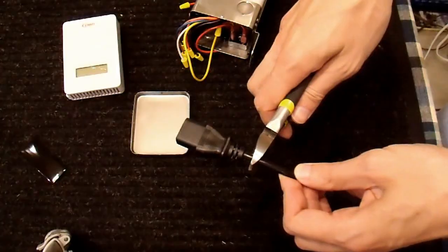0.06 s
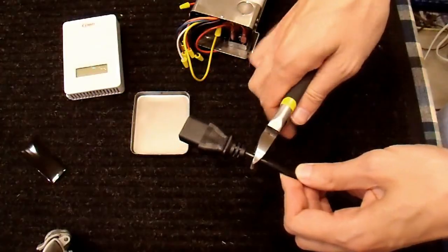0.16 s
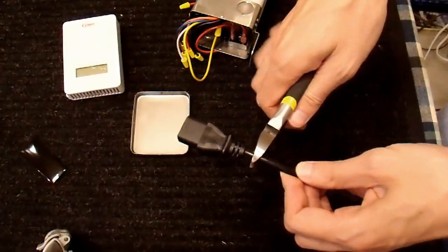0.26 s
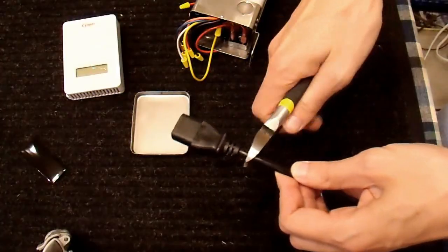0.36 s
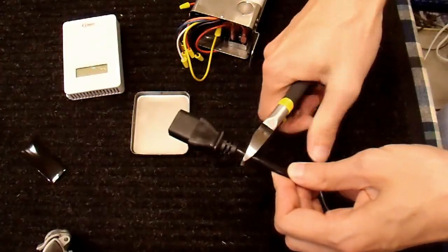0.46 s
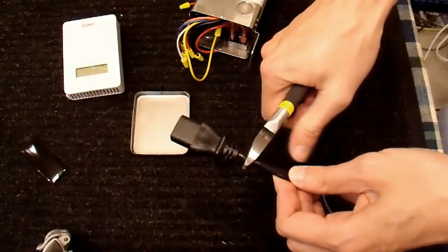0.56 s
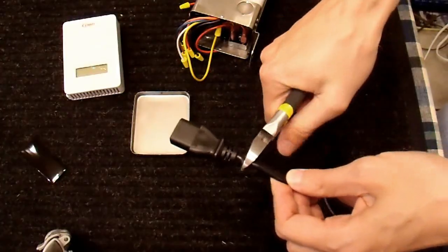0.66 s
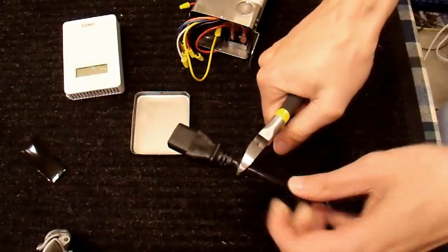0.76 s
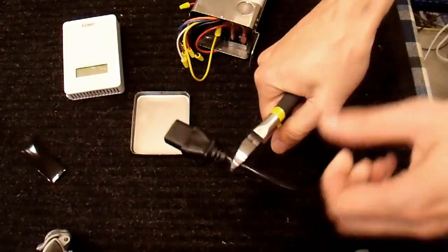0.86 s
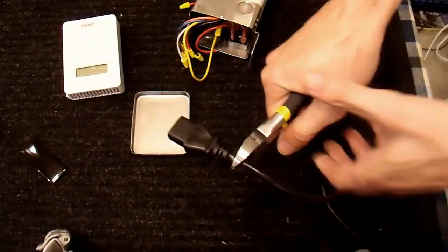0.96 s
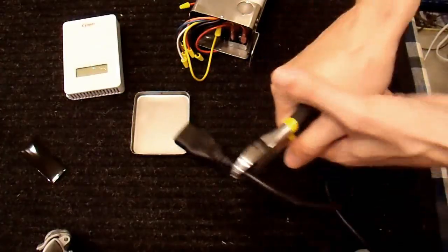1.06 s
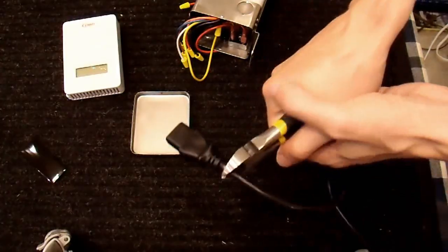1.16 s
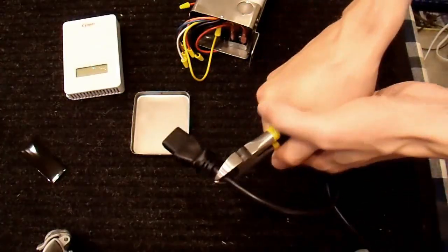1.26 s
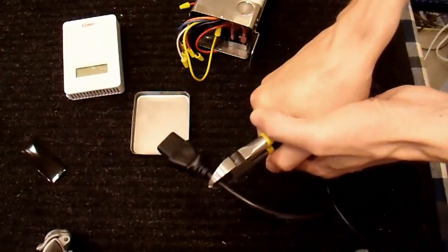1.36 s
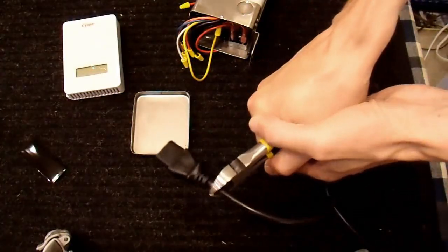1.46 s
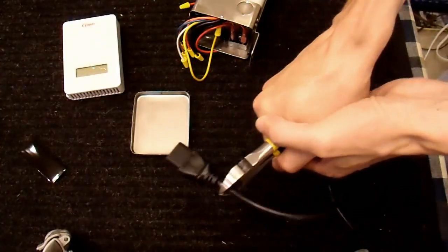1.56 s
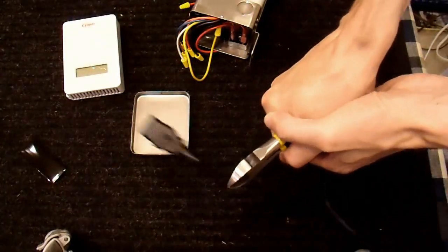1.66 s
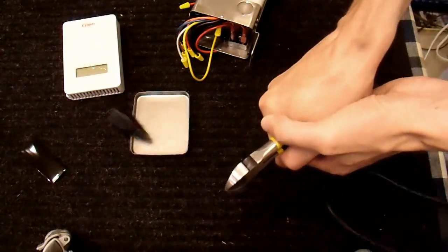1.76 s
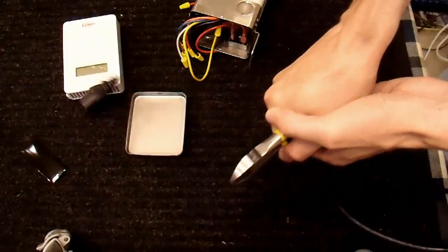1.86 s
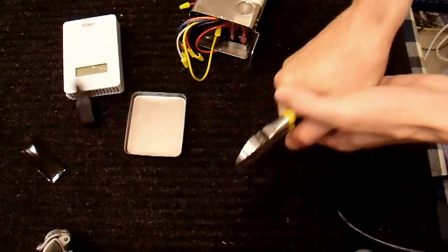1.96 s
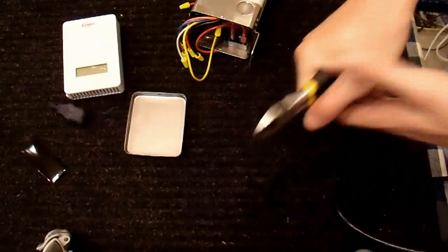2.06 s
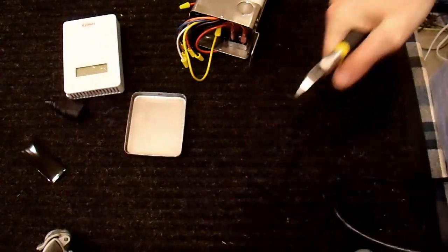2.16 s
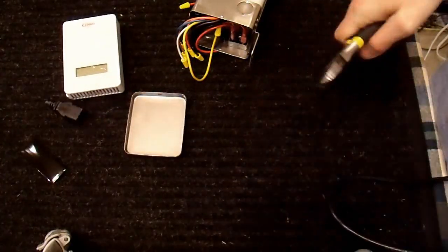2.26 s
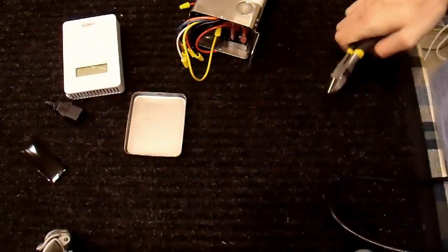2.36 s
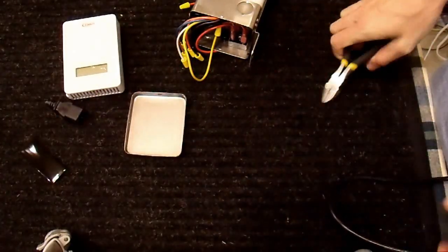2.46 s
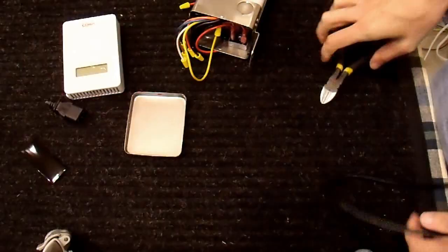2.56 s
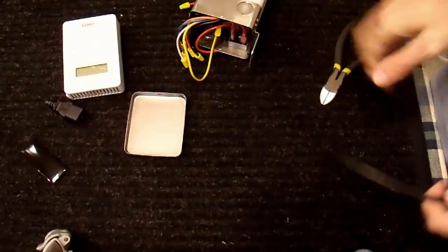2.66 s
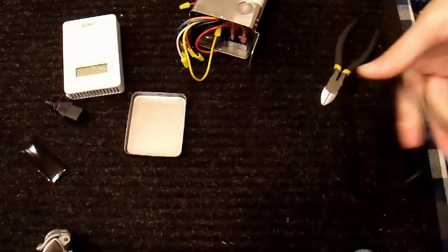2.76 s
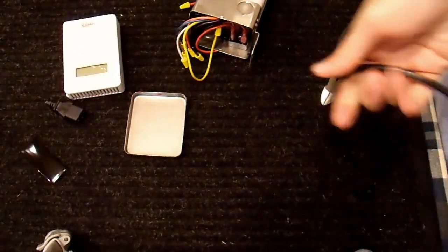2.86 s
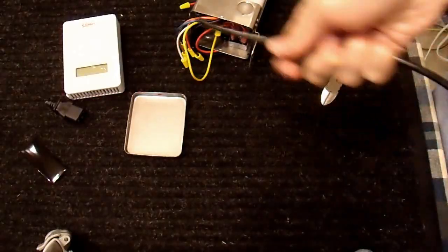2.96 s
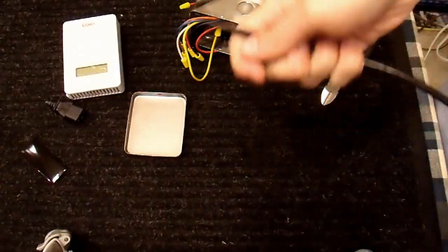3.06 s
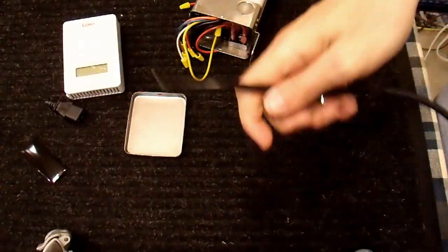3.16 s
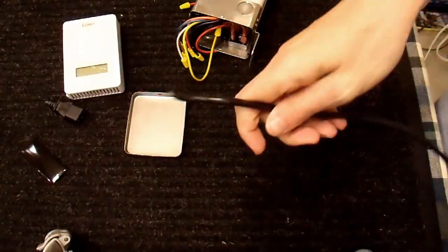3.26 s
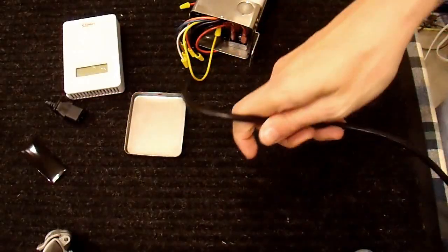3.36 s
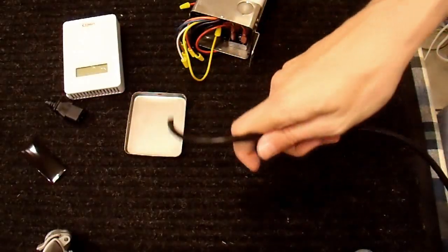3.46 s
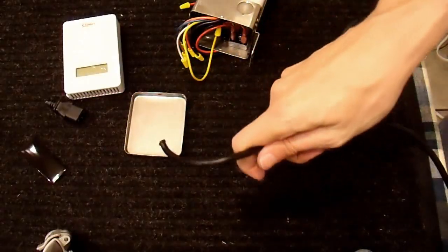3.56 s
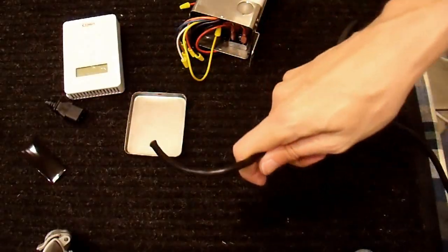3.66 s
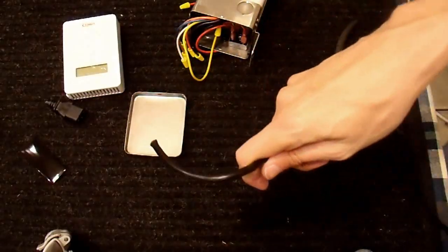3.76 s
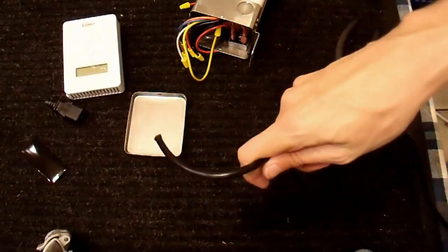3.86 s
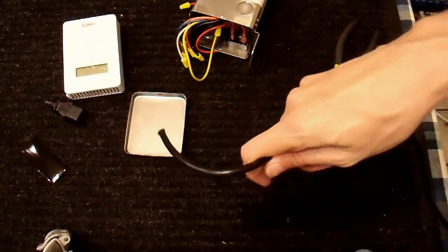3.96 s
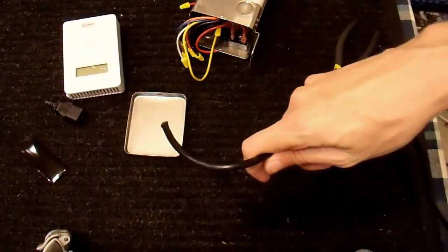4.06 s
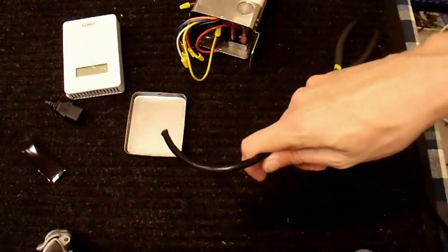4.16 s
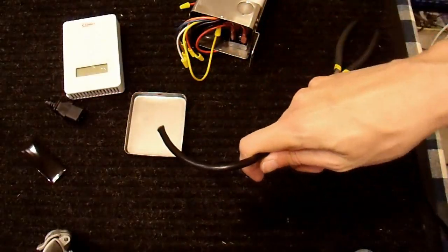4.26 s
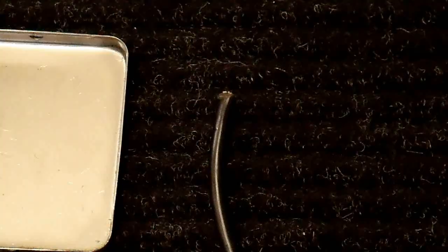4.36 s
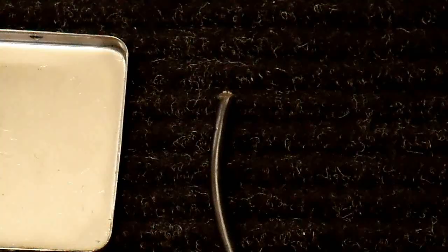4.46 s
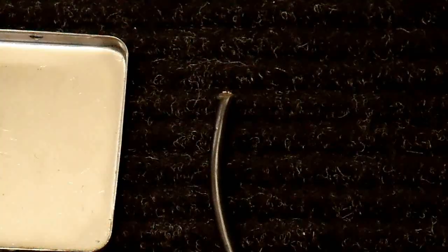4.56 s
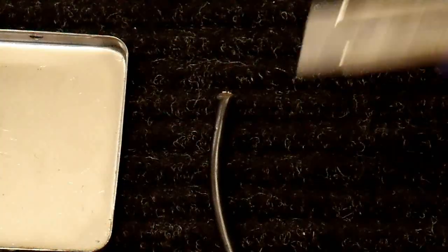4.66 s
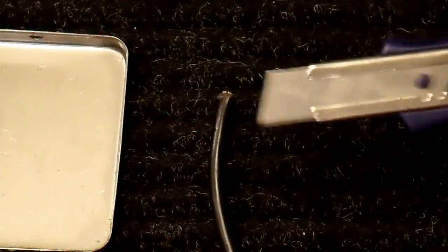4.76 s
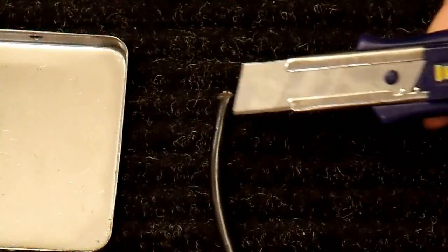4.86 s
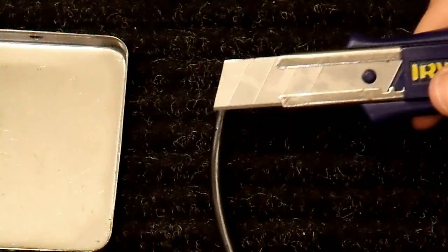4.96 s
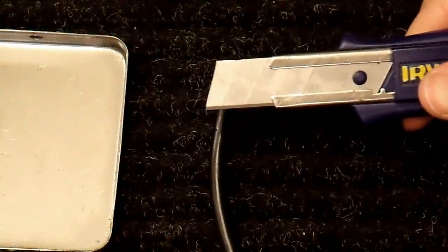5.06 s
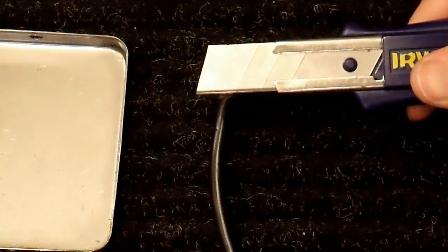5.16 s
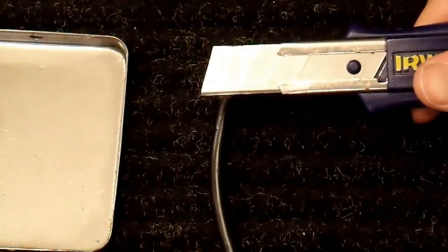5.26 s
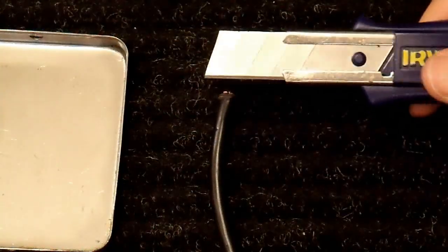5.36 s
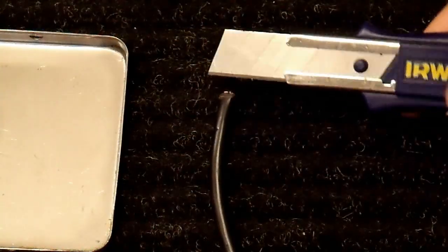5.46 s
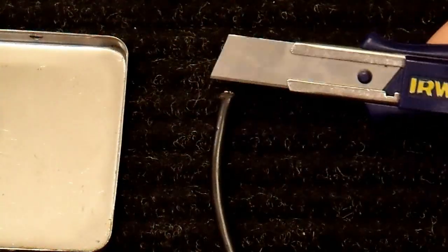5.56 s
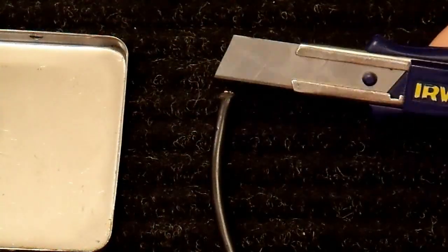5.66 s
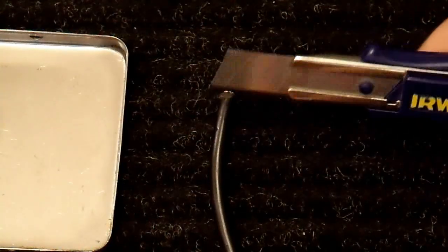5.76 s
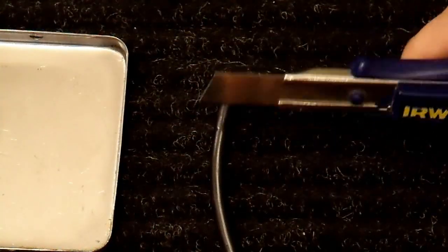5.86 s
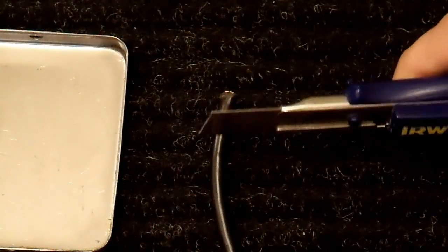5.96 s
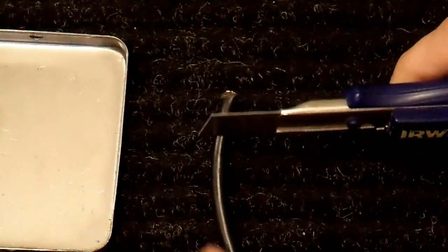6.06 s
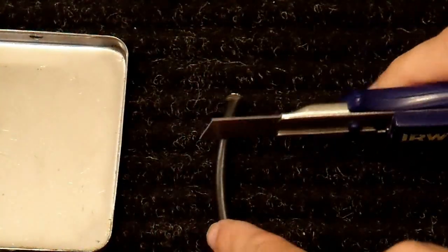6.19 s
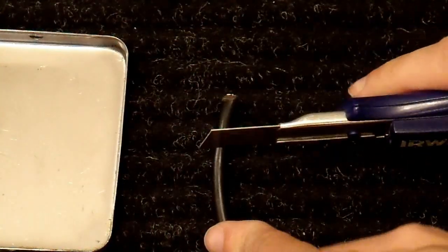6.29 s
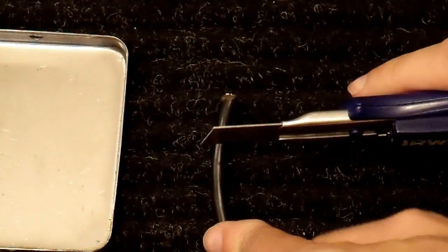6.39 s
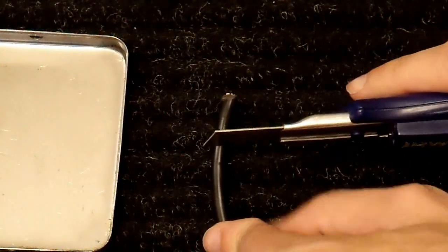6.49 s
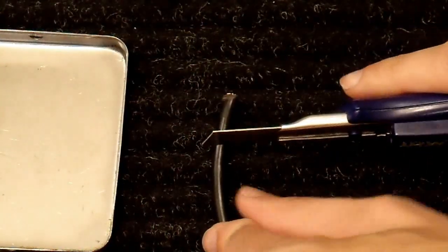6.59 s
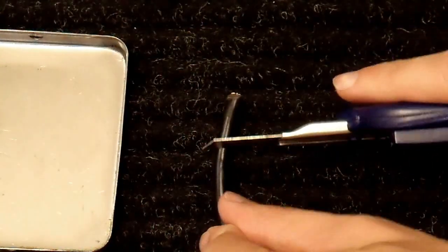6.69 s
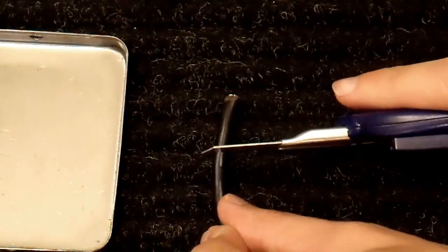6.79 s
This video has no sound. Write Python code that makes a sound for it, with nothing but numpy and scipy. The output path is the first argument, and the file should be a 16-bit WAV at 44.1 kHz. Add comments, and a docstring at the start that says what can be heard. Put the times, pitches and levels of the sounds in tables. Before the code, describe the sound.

Over a faint steady fan, hands rub lightly on a cord, then side cutters crack through it and their handles clack shut. The plug flies off, clangs on a tin lid and tumbles away in weakening knocks. The cutters thump and clatter onto a padded bench, the cord slaps down softly, then a knife slider snaps out in sharp metallic clicks. Close microphone, small room, loud peaks overloaded.

```python
"""Cutting a cord, then clicking out a blade

Side cutters snap through a power cord on a carpeted bench; the plug flies off, rings a tin lid and tumbles
away. The cutters are put down and the cord is laid out; after a hard cut a snap-off knife is pushed out by
notches. Hits are dying noise bursts in each body's colour, with sine modes where metal or bench top rings; rubs
are swelling noise. Near echoes and a small room follow each hit, a fan of filtered noise and tones runs quietly
underneath, and the microphone's amplifier overloads on loud clicks; the knife's handle knocks dully under two
of them."""
import sys
import numpy as np
from scipy import signal
from scipy.fft import rfft, irfft
from scipy.io import wavfile

SR = 44100
rng = np.random.default_rng(int(sys.argv[2]) if len(sys.argv) > 2 else 0)


def unload_wav(signal):
    """Save mono or channel-first audio to the path in sys.argv[1] as 16-bit WAV at rate SR, clipped to [-1, 1]."""
    wavfile.write(
        sys.argv[1],
        SR,
        np.round(np.clip(np.atleast_2d(signal).T, -1, 1) * 32767).astype(np.int16),
    )


N = 301026
TIME = np.arange(N) / SR   # s
CUT_S, CUTOFF_HZ = 4.2928, 15900   # hard cut between the shots; top of the microphone's range

# fan and microphone hiss, colour before and after the cut: (f/Hz, level/dB)
FAN_WIDE = [(15, -45), (25, -4.5), (84, -26), (123, -4), (149, -17.5), (263, -9), (363, -12.5), (503, -10),
            (911, -6), (1230, -11.5), (2480, -4), (3080, -9.5), (10400, -19.5), (12200, -17.5),
            (16000, -25)]
FAN_CLOSE = [(15, -36), (25, 1), (92, -25), (114, -13.5), (242, -8.5), (263, -15.5), (354, -8), (677, -8.5),
             (911, -5), (1130, -11.5), (2160, -4.5), (2480, -6), (9320, -18.5), (10700, -20), (16000, -22)]
FAN_WIDE_DB, FAN_CLOSE_DB = -53.5, -53.5
# resonances in the rush of air before and after the cut: (f/Hz, width/Hz, level/dB)
DUCTS_WIDE = [(892, 81, -64), (2346, 190, -58), (7000, 410, -66)]
DUCTS_CLOSE = [(898, 68, -66), (2180, 120, -59.5), (6730, 990, -64), (10900, 314, -69.5)]
# steady tones of the fan and electronics before and after the cut: (f/Hz, level/dB)
HUM_WIDE = [(118.4, -75), (360.7, -73), (11741, -72)]
HUM_CLOSE = [(360.7, -73), (726.7, -74), (10783, -82), (11741, -79)]

# decay of the small room, band by band: (f/Hz, t60/s)
ROOM_T60 = [(200, 0.43), (1500, .4), (4500, 0.46), (9000, 0.35), (16000, 0.2)]
# nearby surfaces, before each source's own echo trim: (delay/s, level/dB)
ECHOES = [(0.0087, -19), (0.011, -17), (.027, -23)]

# hands and cord rubbing: (t/s, level/dB, length/s)
RUBS = [(0.305, -53, 0.037), (0.365, -53, .1), (0.90, -54, 0.026), (0.985, -50, 0.021),
        (1.585, -47.5, 0.03), (3.51, -52, 0.1)]
# colour of the rubbing: (f/Hz, level/dB)
RUB_COLOUR = [(200, -20), (900, -11), (1800, 2), (2800, -3.5), (4500, -11.5), (12000, -26), (16000, -29.5)]
# the cord dragged over the carpet: (t/s, level/dB, length/s)
DRAGS = [(2.935, -46, .11), (3.07, -56, 0.035)]
# colour of the dragging: (f/Hz, level/dB)
DRAG_COLOUR = [(500, -19), (3000, -7), (4700, 2.5), (7500, -5.5), (11000, -1), (16000, -12)]

# hand and cutters bumping the padded bench top, reference level: (t/s, level/dB)
BUMPS = [(0.889, -57), (2.4510, -36.5), (2.5470, -28), (2.5614, -29.5), (6.60, -55)]
# colour of the bench top: (f/Hz, level/dB)
BENCH_COLOUR = [(25, -22), (85, -1.5), (140, -2.5), (200, -0.5), (290, -2.5), (380, -5.5), (550, -9.5),
                (900, -19), (3000, -43)]
# clearest modes of the bench top, relative to the bump: (f/Hz, level/dB, t60/s)
BENCH_MODES = [(81.4, -21, 0.7), (283, -13, 0.51), (365, -15, 0.38), (373, -17, .36)]
BOOM_DB, BOOM_T60 = -11.5, 0.48   # dB relative to the bump, s
PUSH_S, PUSH_DB = 0.00334, 0   # length of the soft contact, its height relative to the bump

# small steel ticks of the cutters' joint: (t/s, level/dB)
TICKS = [(2.5495, -24), (2.5625, -16.5), (2.618, -27), (2.660, -39), (2.7475, -41), (3.2655, -40.5)]
# colour of the ticks: (f/Hz, level/dB)
TICK_COLOUR = [(500, -25), (2500, -20), (4000, -5), (5300, -5), (6400, 3), (7600, -12.5), (12000, -15),
               (16000, -32)]
TICK_T60 = 0.011   # s
# rubber grips and cord slapping down; the limp cord takes longer to settle: (t/s, level/dB, t60/s)
SLAPS = [(2.7735, -19.5, 0.034), (2.784, -22, 0.031), (3.266, -48, 0.1), (3.732, -33.5, .032),
         (3.741, -42.5, .23)]
# colour of the slaps: (f/Hz, level/dB)
SLAP_COLOUR = [(60, -21), (300, 0.5), (570, 5), (900, -3), (2200, -5.5), (3500, -13.5), (10000, -42),
               (16000, -34)]

# knife slider dropping into its notches, with the blade's ring: (t/s, f/Hz, level/dB)
NOTCHES = [(4.263, 4400, -10), (4.344, 5730, -7), (4.5397, 4318, 6.5), (4.7232, 4190, -8.5),
           (4.86, 4324, 6.5), (5.0993, 4503, 8.5)]
# colour of the notch clicks: (f/Hz, level/dB)
KNIFE_COLOUR = [(100, -37.5), (1500, -21), (2400, -3.5), (3400, -3.5), (4400, 2.5), (5400, -1),
                (6200, -2.5), (7200, 0), (8600, -6.5), (10200, -1), (11200, -3), (12200, 2), (14000, -5.5),
                (16000, -10)]
NOTCH_DB, NOTCH_T60 = 5, 0.014   # dB, s: the same spring drives every click
BLADE_T60 = 0.016   # s
# the slider's spring scraping over the ridge before a notch: (t/s, level/dB)
RATTLES = [(4.522, -35), (4.707, -31.5), (4.854, -35), (5.094, -34)]
# colour of the scraping spring: (f/Hz, level/dB)
RATTLE_COLOUR = [(500, -31.5), (2200, -13), (3300, -1), (4400, 1.5), (5800, -4), (7500, -21), (12000, -24),
                 (16000, -35)]
RATTLE_T60 = 0.05   # s
# the slider settling back as the thumb lets go: (t/s, level/dB, t60/s)
SETTLE = [(5.3433, -24.5, 0.014)]
# dull low knock of the knife's handle under two of the clicks: (t/s, level/dB)
HANDLE_KNOCKS = [(4.3445, -23.5), (5.1005, -25.5)]
# colour of the handle's knock: (f/Hz, level/dB)
HANDLE_COLOUR = [(60, -16.5), (200, -11), (380, -4.5), (650, -14), (1500, -25), (5000, -30)]
HANDLE_T60 = 0.015   # s

# the plug's corner striking the tin lid: (t/s, level/dB, t60/s)
TIN_HITS = [(1.7368, -4, 0.029), (1.7515, -29, 0.024)]
# colour of the crash: (f/Hz, level/dB)
TIN_COLOUR = [(100, -26), (900, -2), (2200, -20), (4000, -13), (5800, 10.5), (7200, -6), (8500, -12),
              (13000, -17.5), (16000, -7)]
# tin lid modes; the close pair near 2760 Hz beats: (f/Hz, level/dB, t60/s)
TIN_MODES = [(883.6, -22, .42), (2385, -26, .38), (2759, -19.5, .63), (2768.6, -21, .6), (3366, -25, .54),
             (3478, -20, .4), (3698, -28, .45), (3812, -26, .52), (4290, -18, .42), (4389, -21, .42),
             (4525, -17, .52), (4892, -18, .43), (5318, -20, .3), (5418, -26, .55), (5689, -16, .27),
             (5793, -10, .3), (6190, -16, .32), (7038, -14, .22), (7456, -27, .28), (7800, -21, .27),
             (8382, -26, .26), (9790, -32, .2), (13000, -29, .2), (15200, -33, .18)]
# the tumbling plug hitting a plastic case: (t/s)
BOUNCES = [1.7947, 1.8530, 1.9430, 2.0920]
# the plug landing on the carpet in between: (t/s)
LANDINGS = [1.7555, 1.954]
# colour of the plug's contacts: (f/Hz, level/dB)
PLUG_COLOUR = [(100, -19.5), (500, -22.5), (820, -2), (1050, -8.5), (1550, 5.5), (2100, -5), (3000, -7.5),
               (4800, -6), (7500, -15.5), (11500, -17.5), (16000, -31)]
# levels in dB as if at the moment the lid is struck, decays in s
TUMBLE_LOSS_DB_PER_S = 56.5
BOUNCE_DB, BOUNCE_T60 = -7.5, 0.026   # hard contact with the case
CHATTER_DB, CHATTER_T60 = -19, 0.12   # the plug shudders after each bounce
LANDING_DB, LANDING_T60 = -18, 0.073   # softer contact with the carpet
LANDING_THUD_DB, LANDING_THUD_T60 = -29.5, 0.22   # the bench top under it

# jaws breaking through sheath and wires: (t/s, level/dB)
SNAPS = [(1.5922, 6), (1.6015, -2.5), (1.6105, -12.5), (1.6185, -6)]
# colour of the snap: (f/Hz, level/dB)
SNAP_COLOUR = [(100, -35), (1100, -21), (1500, -11.5), (2300, -8.5), (3100, -9.5), (4100, 2), (5000, 0.5),
               (6500, -9.5), (10000, -11.5), (16000, -25.5)]
SNAP_T60 = 0.022   # s
# the steel jaws ringing on after the cord gives way: (f/Hz, level/dB, t60/s)
JAW_MODES = [(4690, -20, .3), (5006, -21, .27)]
# handles slamming shut, then cutters dropped on the bench: (t/s, level/dB)
CLACKS = [(1.6413, 3.5), (2.7685, -13.5)]
# colour of the clacks: (f/Hz, level/dB)
CLACK_COLOUR = [(100, -18), (600, -19.5), (1000, -9), (1450, -15.5), (1850, -3), (2300, -6), (3000, 2.5),
                (3600, -18.5), (5800, -2.5), (7500, -13.5), (11000, -11.5), (16000, -29)]
CLACK_T60, JOLT_DB = 0.017, -16.5   # s; dull jolt relative to its clack


def amp(db):
    """Decibels to gain."""
    return 10 ** (np.asarray(db) / 20)


def at_hz(points, hz):
    """Read a table on a log-frequency axis."""
    f, value = np.transpose(points)
    return np.interp(np.log(np.maximum(hz, 1)), np.log(f), value)


def dying(t, t60):
    """Exponential decay that starts at t = 0 and falls 60 dB in t60."""
    return (t >= 0) * np.exp(-np.log(1000) * np.maximum(t, 0) / t60)


def coloured(x, spectrum, size=8192):
    """Causal (minimum-phase) body filter that keeps the power of white noise."""
    gain = amp(at_hz(spectrum, np.arange(size // 2 + 1) * SR / size))
    cepstrum = irfft(np.log(gain / np.sqrt(np.mean(gain ** 2))))
    # folding the cepstrum forward makes the filter minimum-phase
    cepstrum[1:size // 2] *= 2
    cepstrum[size // 2 + 1:] = 0
    response = irfft(np.exp(rfft(cepstrum)))
    return signal.oaconvolve(x, response)[:N]


def resonate(x, hz, width_hz):
    """One resonance that keeps the power of white noise."""
    r = np.exp(-np.pi * width_hz / SR)
    poles = [1, -2 * r * np.cos(2 * np.pi * hz / SR), r * r]
    return np.sqrt((1 - r * r) / 2) * signal.lfilter([1, 0, -1], poles, x + 1e-18)


def alike(rows, t60, gain_db=0.):
    """Contacts (t/s, level/dB) on one body share a decay time."""
    return [(s, db + gain_db, t60) for s, db in rows]


def fan(colour, db, resonances, tones):
    """Steady rush of air and hiss with a few resonances and faint steady tones."""
    rush = amp(db) * coloured(rng.standard_normal(N), colour)
    ducts = sum(amp(level) * resonate(rng.standard_normal(N), hz, width) for hz, width, level in resonances)
    hum = sum(amp(level) * np.sqrt(2) * np.sin(2 * np.pi * hz * TIME) for hz, level in tones)
    return rush + ducts + hum


def room_tail(t, build_s=0.0066):
    """Diffuse room sound of unit energy: it builds up, then dies band by band."""
    white = rfft(rng.standard_normal(len(t)))
    hz = np.arange(len(white)) * SR / len(t)
    centres = [centre for centre, _ in ROOM_T60]
    tail = np.zeros(len(t))
    # each band crossfades into its neighbours
    for band, (_, t60) in zip(np.eye(len(centres)), ROOM_T60):
        weight = at_hz(list(zip(centres, band)), hz)
        tail += irfft(white * weight, len(t)) * dying(t, t60)
    tail *= 1 - np.exp(-(t / build_s) ** 2)
    return tail / np.sqrt(np.sum(tail ** 2))


def blows(rows, colour, tail_db, echo_db, hold_s=0.):
    """Each contact holds briefly, then its dense modes die; echoes and room follow in the body's colour."""
    out, t = np.zeros(N), np.arange(SR // 2) / SR
    for s, db, t60 in rows:
        envelope = dying(np.maximum(t - hold_s, 0), t60)
        burst = amp(db) * envelope * rng.standard_normal(len(t))
        # the room gathers sound from all directions, so it keeps only part of the direct sound's ripple
        rippled = signal.fftconvolve(burst, room_tail(t))[:len(t)]
        even = np.sqrt(np.sum(burst ** 2)) * room_tail(t)
        heard = burst + amp(tail_db) * (.6 * rippled + .8 * even)
        for delay, level in ECHOES:
            # cluttered surfaces scatter each echo, so it gets fresh noise
            heard += amp(db + level + echo_db) * dying(t - delay, t60) * rng.standard_normal(len(t))
        at = int(s * SR)
        out[at:at + len(t)] += heard[:N - at]
    return coloured(out, colour)


def ringing(s, modes):
    """Clear modes set off by one blow, each a dying sine."""
    out, t, at = np.zeros(N + SR), np.arange(SR) / SR, int(s * SR)
    for k, (hz, db, t60) in enumerate(modes):
        polarity = (-1) ** (k // 2)
        out[at:at + SR] += polarity * amp(db) * dying(t, t60) * np.sin(2 * np.pi * hz * t)
    return out[:N]


def strokes(rows, colour):
    """Friction noise that swells and fades with each movement."""
    level = sum(amp(db) * np.exp(-2 * ((TIME - s) / length) ** 2) for s, db, length in rows)
    return coloured(level * rng.standard_normal(N), colour)


def push(s):
    """A padded contact presses once, smoothly."""
    return np.sin(np.pi * np.clip((TIME - s) / PUSH_S, 0, 1)) ** 2


def bench():
    """Each bump is a short push with which the bench top starts to boom and ring."""
    out = blows(alike(BUMPS, BOOM_T60, BOOM_DB), BENCH_COLOUR, tail_db=-25, echo_db=-4)
    for s, db in BUMPS:
        out += amp(db) * (ringing(s, BENCH_MODES) - amp(PUSH_DB) * push(s))
    return out


def handling():
    """Cutters and cord are moved about and put down: steel ticks, bumps, slaps, rubs and drags."""
    ticks = blows(alike(TICKS, TICK_T60), TICK_COLOUR, tail_db=-17.5, echo_db=-3)
    slaps = blows(SLAPS, SLAP_COLOUR, tail_db=-36, echo_db=-4.5)
    return ticks + bench() + slaps + strokes(RUBS, RUB_COLOUR) + strokes(DRAGS, DRAG_COLOUR)


def handle_knocks():
    """Dull low knock of the knife's handle under two of the clicks, made as a short dark noise burst."""
    return blows(alike(HANDLE_KNOCKS, HANDLE_T60), HANDLE_COLOUR, tail_db=-31, echo_db=-22)


def knife():
    """The slider's spring snaps into each notch and the blade rings briefly in its track."""
    notches = [(s, NOTCH_DB, NOTCH_T60) for s, _, _ in NOTCHES]
    clicks = blows(notches, KNIFE_COLOUR, tail_db=-15.0, echo_db=0.4, hold_s=0.00054)
    blade = sum(ringing(s, [(hz, ring_db, BLADE_T60)]) for s, hz, ring_db in NOTCHES)
    spring = blows(alike(RATTLES, RATTLE_T60) + SETTLE, RATTLE_COLOUR, tail_db=-17.5, echo_db=-7)
    return clicks + blade + spring


def tumbling(times, db, t60):
    """Contacts of the plug, weaker the longer it has been tumbling since it struck the lid."""
    return [(s, db - TUMBLE_LOSS_DB_PER_S * (s - TIN_HITS[0][0]), t60) for s in times]


def plug():
    """The severed plug sets the tin lid ringing and tumbles on over case and carpet."""
    crash = blows(TIN_HITS, TIN_COLOUR, tail_db=-16, echo_db=-7, hold_s=.005)
    lid = ringing(TIN_HITS[0][0], TIN_MODES)
    contacts = tumbling(BOUNCES, BOUNCE_DB, BOUNCE_T60)
    contacts += tumbling(BOUNCES, CHATTER_DB, CHATTER_T60)
    contacts += tumbling(LANDINGS, LANDING_DB, LANDING_T60)
    tumble = blows(contacts, PLUG_COLOUR, tail_db=-10, echo_db=-1, hold_s=.002)
    bench_hits = tumbling(LANDINGS, LANDING_THUD_DB, LANDING_THUD_T60)
    thuds = blows(bench_hits, BENCH_COLOUR, tail_db=-29, echo_db=-14)
    return crash + lid + tumble + thuds


def cutters():
    """The cord gives way in a few cracks, the jaws ring, and each clack of the cutters has a dull jolt."""
    snap = blows(alike(SNAPS, SNAP_T60), SNAP_COLOUR, tail_db=-9.5, echo_db=-9.0, hold_s=0.0012)
    jaws = ringing(SNAPS[0][0], JAW_MODES)
    clack = blows(alike(CLACKS, CLACK_T60), CLACK_COLOUR, tail_db=-20.0, echo_db=-0.5)
    jolt = blows(alike(CLACKS, CLACK_T60, JOLT_DB), BENCH_COLOUR, tail_db=-38, echo_db=-1)
    return snap + jaws + clack + jolt


def scene():
    """Two shots joined by a hard cut, which falls in the tail of the knife's first click."""
    wide = fan(FAN_WIDE, FAN_WIDE_DB, DUCTS_WIDE, HUM_WIDE) + plug() + cutters()
    close = fan(FAN_CLOSE, FAN_CLOSE_DB, DUCTS_CLOSE, HUM_CLOSE) + handle_knocks() + knife()
    shots = np.where(TIME < CUT_S, wide, close)
    return (shots + handling())[None]


def record(dry):
    """The microphone's amplifier overloads, rounding off loud peaks; then the top is cut."""
    fine = signal.resample_poly(dry, 4, 1, axis=-1)   # oversampled, so that clipping aliases less
    clipped = fine / (1 + (fine / .76) ** 4) ** .25
    low_pass = signal.firwin(801, CUTOFF_HZ, window=("kaiser", 8), fs=4 * SR)
    return signal.resample_poly(clipped, 1, 4, axis=-1, window=low_pass)


dry = scene()
out = record(dry)
unload_wav(out)
```